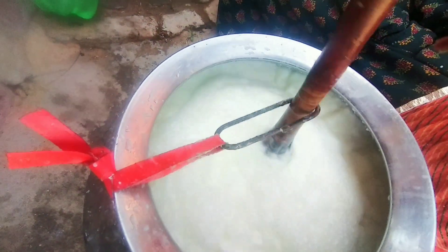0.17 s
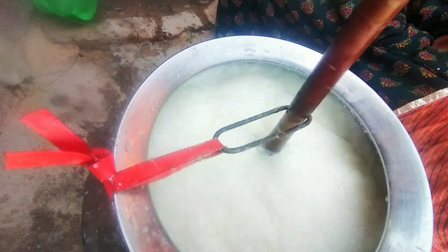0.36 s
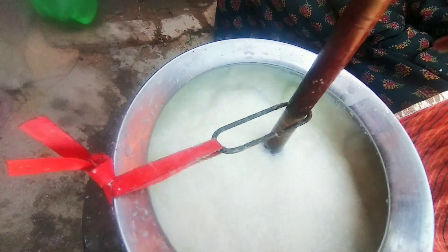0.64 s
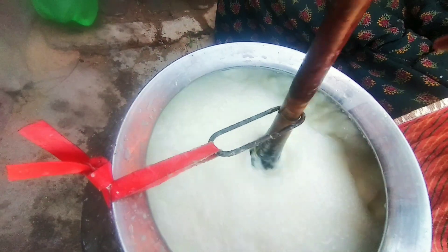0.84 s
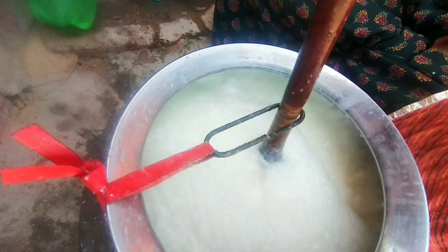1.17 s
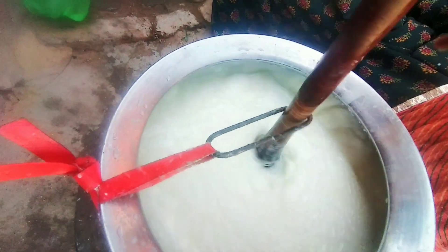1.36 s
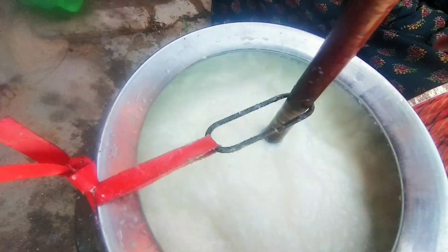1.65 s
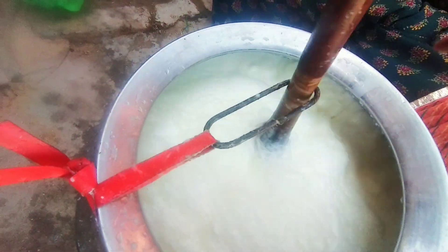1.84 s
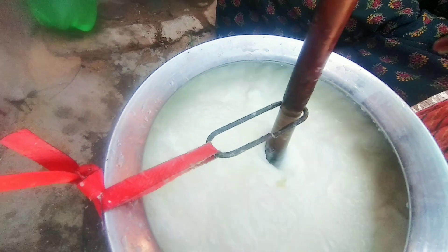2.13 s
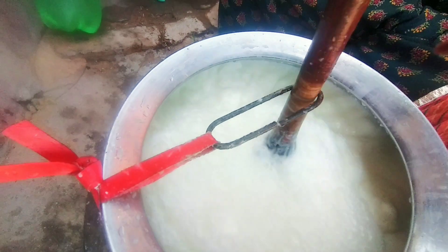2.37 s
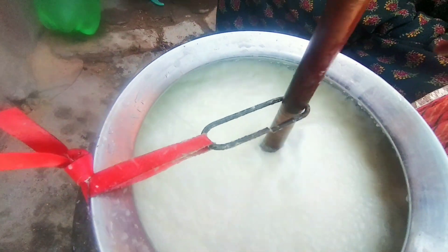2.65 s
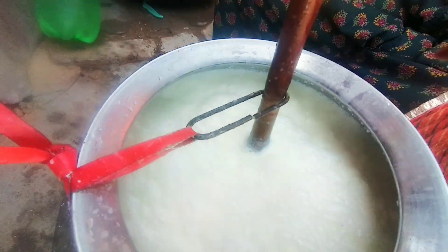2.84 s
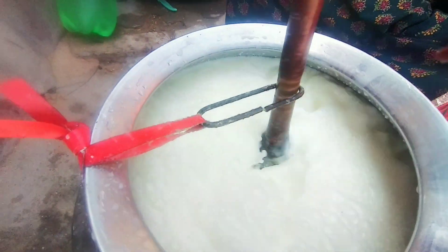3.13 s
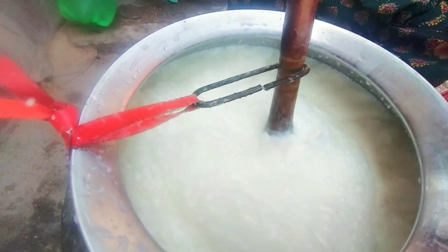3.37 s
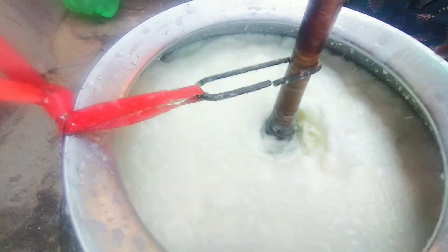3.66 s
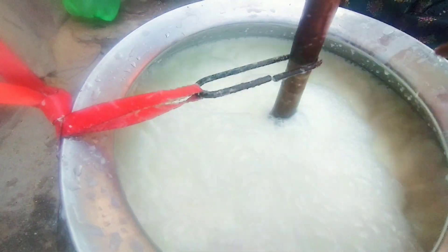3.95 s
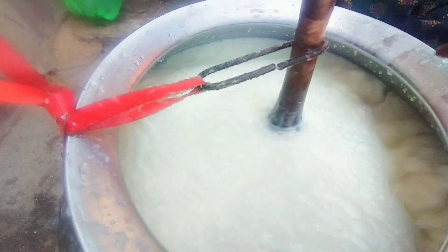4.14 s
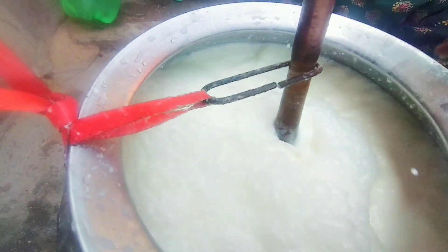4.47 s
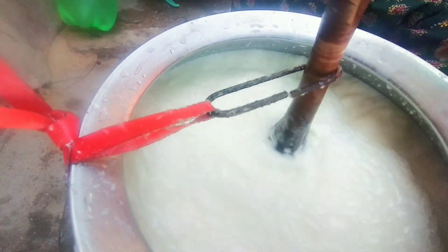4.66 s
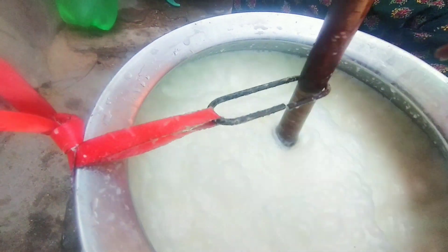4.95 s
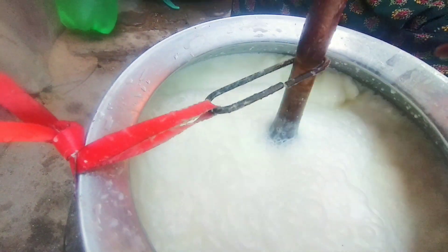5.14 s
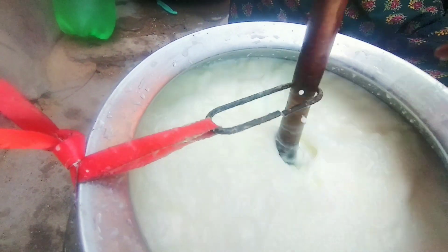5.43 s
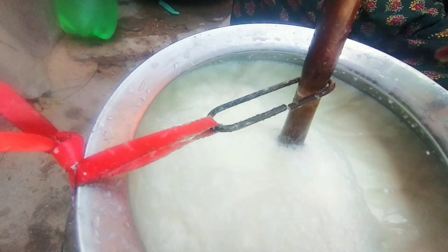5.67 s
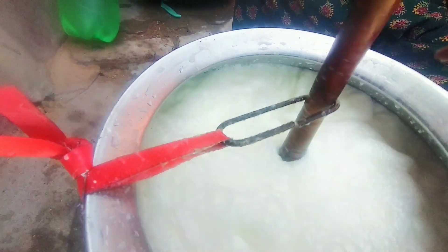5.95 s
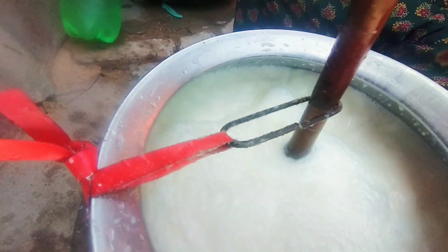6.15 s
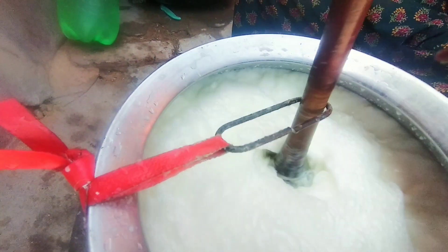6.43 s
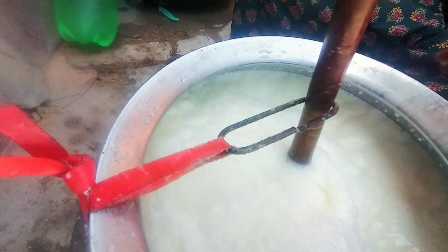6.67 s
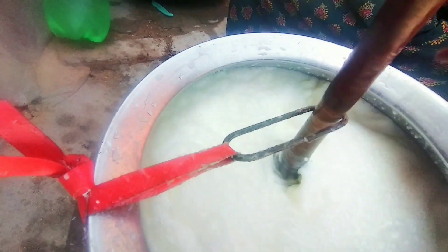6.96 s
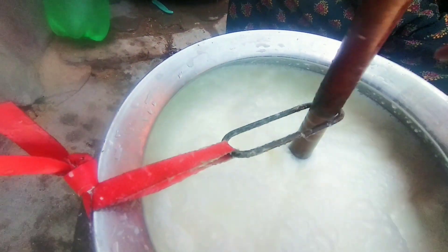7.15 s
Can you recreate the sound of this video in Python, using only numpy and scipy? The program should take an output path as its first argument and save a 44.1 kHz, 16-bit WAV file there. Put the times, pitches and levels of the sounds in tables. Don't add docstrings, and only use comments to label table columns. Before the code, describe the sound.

Close stereo view of curd being churned in a wide steel pot outdoors. About every half second a pull throws up a hollow, splashing slosh, with low glugs, gurgling bubbles and wet slaps on the walls. Fine spray hisses and drops tick back down between strokes. A soft low breeze rumbles at the hand-held phone.

```python
import sys
import numpy as np
from scipy import signal
from scipy.fft import rfft, irfft
from scipy.io import wavfile
from scipy.ndimage import uniform_filter1d

SR = 44100
rng = np.random.default_rng(int(sys.argv[2]) if len(sys.argv) > 2 else 0)


def how_loud(loudness_db):
    steps = np.asarray(loudness_db, float) / 20
    return 10 ** steps


def store_pcm(level_fs):
    pcm = np.round(np.clip(level_fs, -1, 1) * 32767).astype(np.int16)
    wavfile.write(sys.argv[1], SR, np.atleast_2d(pcm).T)


N = 321930
T = np.arange(N) / SR
HZ = np.fft.rfftfreq(N, 1 / SR)


def evened(x):
    return x / np.sqrt(np.mean(x ** 2) + 1e-20)


def read(points, hz):
    f, value = np.transpose(points)
    return np.interp(np.log(hz + 1), np.log(f + 1), value)


def coloured(x, points):
    return irfft(rfft(x) * how_loud(read(points, HZ)), N)


def ring(x, modes, order=1):
    delay = np.exp(-2j * np.pi * np.fft.rfftfreq(x.shape[-1]))
    response = 0
    for k, (hz, width_hz, db) in enumerate(modes):
        radius = np.exp(-np.pi * width_hz / SR)
        turn = np.exp(2j * np.pi * hz / SR)
        pair = sum(((1 - radius) / (1 - radius * pole * delay)) ** order for pole in (turn, 1 / turn))
        response = response + (-1) ** k * how_loud(db) / 2 * pair
    return irfft(rfft(x) * response, x.shape[-1])


def bursts(per_s, spread_db, decay_s, bed):
    happens = rng.random(N) < per_s / SR
    size = how_loud(spread_db * np.minimum(rng.exponential(1, N), 4)) * happens
    shape = evened(signal.filtfilt([1], [1, -np.exp(-1 / (decay_s * SR))], size))
    return (bed + shape) * rng.standard_normal((2, N))


def add(mix, s, sound):
    part = mix[:, round(s * SR):][:, :sound.shape[1]]
    part += sound[:, :part.shape[1]]


# start_s (of the peak), width_s (time to lose 10 dB), level_db
GUSTS = [(0.11, 0.17, -35.5), (0.47, 0.1, -39.0), (1.04, 0.11, -37.5), (1.48, 0.35, -40.5),
         (1.84, 0.31, -46.0), (2.2, 0.18, -43.0), (2.36, 0.09, -38.5), (2.67, 0.2, -37.0),
         (3.31, 0.18, -39.0), (3.48, 0.06, -35.5), (3.85, 0.17, -38.5), (4.4, 0.2, -37.5),
         (4.61, 0.07, -36.5), (4.87, 0.12, -38.0), (5.1, 0.12, -34.0), (5.53, 0.17, -33.5),
         (5.67, 0.09, -26.0), (5.94, 0.1, -37.5), (6.16, 0.34, -43.0), (6.92, 0.04, -33.5),
         (7.25, 0.5, -38.0)]
CALM_DB = -51


def gusts():
    power = sum(how_loud(db - 10 * ((T - s) / width_s) ** 2) ** 2 for s, width_s, db in GUSTS)
    return np.sqrt(how_loud(CALM_DB) ** 2 + power)


# frequency_hz, level_db (per Hz)
YARD = [(25, -9), (110, -8), (250, -17.5), (500, -3), (1000, -7), (2000, -25), (3600, -30.5), (10000, -41),
        (12000, -47), (15700, -50)]
YARD_DB = -45


def yard():
    lumps = bursts(per_s=13, spread_db=-2, decay_s=0.026, bed=2.3)
    breeze = ring(lumps, [(58, 28.5, 6), (30.2, 57, -14.5), (82, 32, -4)], order=2)
    wash = coloured(rng.standard_normal((2, N)), YARD)
    return how_loud(1.6) * gusts() * evened(breeze) + how_loud(YARD_DB) * evened(wash)


# start_s, level_db (peak), pitch_hz (centre), brightness_db
DROPS = [(0.2957, -25, 6260, -25), (0.5394, -34, 4410, -14), (0.6054, -43, 3570, 2),
         (0.7572, -37, 6070, -14), (1.0416, -31, 5670, -5), (1.1751, -34, 5730, -14),
         (1.4192, -26, 4760, -17), (1.5924, -25, 3580, -14), (1.6496, -29, 3520, -22),
         (1.6664, -33, 3500, -13), (2.5296, -22, 4070, -20), (2.779, -19, 3500, -18),
         (2.786, -18, 6500, -13), (3.5299, -36, 7350, -19), (3.6175, -34, 7660, -22),
         (3.6456, -21, 5660, -27), (3.7394, -23, 4150, -9), (3.8891, -26, 3680, -25),
         (3.9744, -38, 6030, -27), (4.0888, -24, 7000, -4), (4.109, -33, 5400, -9), (4.137, -36, 5660, -29),
         (4.391, -29, 5320, -7), (4.9314, -19, 3710, -17), (4.9797, -23, 3540, -23),
         (4.9994, -21, 6660, -22), (5.4674, -30, 3500, -7), (5.6885, -39, 3790, -18),
         (6.0691, -28, 5000, -30), (6.7356, -38, 4640, -5), ]
# start_s, level_db (peak)
TICKS = [(0.2823, -38), (0.3646, -25), (0.5945, -41), (0.8824, -32), (1.4052, -32), (1.5339, -23),
         (1.9365, -46), (1.9724, -30), (2.0627, -26), (2.4972, -31), (2.5391, -29), (2.8474, -42),
         (3.0739, -38), (3.243, -32), (3.7933, -29), (3.9175, -46), (4.2128, -36), (4.2278, -27),
         (4.4448, -42), (4.7671, -36), (4.8239, -27), (5.0908, -54), (5.3258, -34), (5.6067, -46),
         (5.8451, -36), (5.8571, -23), (6.4203, -36), (6.792, -50), (6.9596, -44), (6.9835, -34)]
TICK_HZ, TICK_BODY_DB, TICK_TOP_DB = 6500, -3.5, -2.5
# start_s, level_db (peak), pitch_hz (centre)
SPECKS = [(0.1321, -47, 6890), (0.3774, -23, 5630), (0.5154, -37, 5670), (0.8495, -31, 5470),
          (0.9981, -28, 7870), (1.3932, -31, 6900), (1.4117, -25, 5330), (1.9849, -25, 4850),
          (2.5197, -25, 5800), (2.6574, -23, 5810), (2.7544, -33, 5880), (2.7994, -38, 4520),
          (2.8294, -39, 6310), (2.8424, -41, 7000), (2.9844, -51, 5660), (3.1093, -24, 4550),
          (3.5578, -44, 7640), (3.8182, -26, 4810), (3.9644, -38, 4910), (4.0594, -51, 5530),
          (4.2053, -31, 5440), (4.2223, -21, 6440), (4.2956, -22, 5340), (4.3365, -26, 6770),
          (4.3454, -28, 6540), (4.7935, -24, 5520), (4.8813, -27, 5310), (5.0913, -41, 4840),
          (5.9015, -23, 7170), (5.9444, -20, 5430), (5.9644, -19, 7680), (5.9724, -23, 5950),
          (6.1394, -45, 4870), (6.4403, -28, 5670), (6.4694, -26, 6290), (6.5844, -37, 5920),
          (6.9636, -35, 6520), (6.9735, -27, 5010), (7.0204, -20, 4850), (7.1544, -23, 6090),
          (7.2474, -44, 5570)]
SPECK_BODY_DB, SPECK_TOP_DB = -3.5, -12
SNAP = 3.5


def drops():
    out, t = np.zeros((2, N)), np.arange(1500) / SR
    shape = (1 - np.exp(-t / 0.0004)) * (np.exp(-t / 0.0014) + 0.1 * np.exp(-t / 0.008))
    ticks = [(s, db + TICK_BODY_DB, TICK_HZ, TICK_TOP_DB) for s, db in TICKS]
    specks = [(s, db + SPECK_BODY_DB, hz, SPECK_TOP_DB) for s, db, hz in SPECKS]
    for s, db, hz, bright_db in list(DROPS) + ticks + specks:
        puff = rng.standard_normal((2, len(t))) * shape + SNAP * (t == t[6])
        body = ring(puff, [(hz, 2500, 0), (0.83 * hz, 2500, -5)], order=2)
        tick = ring(puff, [(8800, 2500, 1), (11300, 4300, 0), (14000, 4000, -13)], order=2)
        impact = body / abs(body).max() + how_loud(bright_db) * tick / abs(tick).max()
        add(out, s, how_loud(db - 1.5) * impact)
    return out


def plops(rows, climb, rise_s, decay_s, loss_db):
    out, t = np.zeros((2, N)), np.arange(2000) / SR
    envelope = (1 - np.exp(-t / rise_s)) * np.exp(-t / decay_s)
    for (s, db, hz), turn in zip(rows, rng.random((len(rows), 2))):
        tone = np.sin(2 * np.pi * (hz * (t + climb * t ** 2) + turn[:, None]))
        add(out, s, how_loud(db - loss_db) * tone * envelope)
    return out


# start_s, level_db (peak), pitch_hz
BUBBLES = [(.218, -29, 1780), (.718, -32, 1390), (.797, -28, 1510), (.874, -11.5, 1790), (1.364, -25, 1900),
           (1.367, -30, 2630), (1.88, -27, 1450), (1.905, -28, 1490), (2.026, -10, 1850),
           (2.439, -33, 1550), (2.48, -30, 2040), (3.49, -30, 1890), (3.565, -33, 2020),
           (4.687, -26.5, 1240), (5.018, -24, 2500), (5.161, -26, 1050), (5.177, -38, 2700),
           (5.188, -28, 1200), (5.188, -36, 2100), (5.199, -21, 1350), (5.209, -34, 2600),
           (5.227, -35, 2800), (5.236, -31, 1900), (5.291, -24, 1170), (5.727, -40, 2300),
           (5.796, -28, 2100), (5.819, -33, 2840), (6.497, -10, 1520), (6.714, -24, 1110)]


def bubbles():
    return plops(BUBBLES, climb=14.2, rise_s=0.00052, decay_s=0.0024, loss_db=-1.5)


# start_s, level_db (peak), pitch_hz
SLAPS = [(0.2942, -23, 1760), (0.3212, -17, 1930), (0.3431, -13, 1670), (0.5147, -23, 2110),
         (0.5342, -20, 1840), (0.851, -13, 1970), (1.062, -26, 1940), (1.4132, -19, 1770),
         (1.4815, -13, 2020), (1.5434, -20, 2100), (1.95, -26, 1930), (1.9769, -19, 1810),
         (2.1146, -17, 1860), (2.5102, -22, 1900), (2.5222, -18, 1870), (2.5391, -12, 1670),
         (2.5721, -12, 2000), (3.0644, -24, 1390), (3.1048, -16, 1220), (3.1537, -14, 1810),
         (3.6067, -29, 1960), (3.6845, -17, 1640), (3.6945, -14, 1460), (3.7115, -10, 1350),
         (3.8023, -17, 1720), (4.2128, -19, 1810), (4.2263, -14, 1490), (4.2807, -13, 1790),
         (4.7272, -23, 1380), (4.7631, -16, 1450), (4.8494, -13, 1790), (4.9317, -19, 1990),
         (4.9766, -20, 2030), (5.3253, -21, 1870), (5.3438, -18, 1730), (5.8551, -17, 1450),
         (5.875, -14, 1400), (6.3794, -29, 1250), (6.4058, -24, 2160), (6.4203, -21, 1500),
         (6.4428, -13, 1500), (6.4852, -9, 1400), (6.775, -31, 1130), (6.9536, -24, 1380),
         (6.9701, -18, 1990), (7.0314, -10, 1360), (7.0743, -10, 1570), (7.0864, -12, 1480),
         (7.1062, -16, 2060)]


def slaps():
    return plops(SLAPS, climb=12.5, rise_s=0.0005, decay_s=0.0022, loss_db=-0.8)


# start_s, level_db (peak), pitch_hz
MORE_GLUGS = [(0.323, -15, 552), (0.396, -13, 401), (0.821, -26, 498), (0.891, -15, 447), (0.986, -15, 428),
              (1.095, -19, 409), (1.556, -14, 471), (1.638, -19, 568), (2.027, -14, 530), (2.054, -9, 484),
              (2.227, -17, 463), (2.521, -18, 503), (2.686, -15, 455), (2.89, -24, 458), (2.943, -27, 514),
              (3.194, -10, 616), (3.219, -8, 471), (3.261, -15, 576), (3.307, -16, 495), (3.488, -22, 482),
              (3.719, -11, 460), (3.769, -11, 474), (3.863, -18, 458), (3.915, -18, 425), (4.262, -13, 517),
              (4.305, -8, 493), (4.349, -14, 433), (4.461, -19, 420), (4.762, -17, 331), (4.787, -12, 554),
              (4.813, -12, 452), (4.862, -9, 525), (4.917, -14, 506), (4.955, -18, 474), (5.269, -25, 509),
              (5.326, -15, 506), (5.465, -12, 439), (5.489, -14, 503), (5.864, -15, 471), (5.931, -10, 460),
              (5.992, -14, 530), (6.471, -16, 528), (6.495, -15, 592), (6.578, -14, 506), (6.963, -17, 525)]


def more_glugs():
    return plops(MORE_GLUGS, climb=4.1, rise_s=0.002, decay_s=0.006, loss_db=-3)


# start_s, level_db (peak), pitch_hz
GLUGS = [(0.363, -11, 517), (0.551, -13, 455), (1.5, -14, 460), (1.785, -14.5, 415), (2.121, -12, 523),
         (2.294, -17, 550), (2.421, -12, 440), (2.604, -7, 487), (2.641, -4.5, 476), (2.739, -15, 480),
         (3.241, -10, 545), (3.698, -14, 526), (3.79, -8.5, 470), (4.241, -10, 550), (4.844, -9, 479),
         (5.087, -11.5, 414), (5.159, -21, 533), (5.176, -18, 387), (5.534, -11.5, 500), (5.917, -5.5, 490),
         (6.05, -13, 440), (6.546, -13, 440), (6.714, -17, 510), (7.085, -7, 520), (7.166, -11, 450)]


def glugs():
    return plops(GLUGS, climb=4.3, rise_s=0.0028, decay_s=0.0066, loss_db=2)


# start_s, length_s, level_db, sag_db (over its length)
PULLS = [(0.346, 0.133, -36.0, 4.5), (0.877, 0.135, -35.0, 7.0), (1.413, 0.131, -42.5, -4.5),
         (1.982, 0.094, -38.5, -1.0), (2.538, 0.162, -32.5, 6.5), (3.099, 0.158, -38.5, -3.5),
         (3.698, 0.154, -32.5, 13.5), (4.226, 0.131, -34.5, 8.0), (4.76, 0.125, -38.0, -1.0),
         (5.321, 0.051, -42.0, -0.5), (5.86, 0.12, -41.0, -9.0), (6.431, 0.101, -40.0, -3.5),
         (6.982, 0.134, -35.0, 0.5)]
# start_s, length_s, level_db
SLOPS = [(0.295, 0.009, -46.0), (0.328, 0.005, -45.5), (0.453, 0.005, -53.0), (0.531, 0.015, -44.5),
         (1.024, 0.029, -55.0), (1.417, 0.087, -38.0), (1.567, 0.025, -42.0), (1.635, 0.032, -46.0),
         (2.111, 0.008, -42.5), (2.469, 0.045, -57.0), (2.688, 0.068, -42.5), (2.778, 0.031, -41.5),
         (3.077, 0.008, -48.0), (3.315, 0.006, -51.0), (3.648, 0.146, -43.0), (3.819, 0.014, -43.0),
         (3.889, 0.009, -43.0), (4.365, 0.022, -45.5), (4.757, 0.044, -53.0), (4.93, 0.005, -41.0),
         (4.977, 0.014, -39.5), (5.397, 0.017, -40.5), (5.463, 0.005, -46.0), (5.857, 0.005, -55.0),
         (6.048, 0.018, -48.0), (6.549, 0.041, -46.0), (7.135, 0.045, -38.5), (7.196, 0.031, -45.5)]
# rest_s, rest_db, crest_s, crest_db,
# heave_db (of the heavy mass, below the crest)
SWELLS = [(-0.4, -45.5, -0.1, -30.0, -7.5), (0.18, -38.0, 0.33, -20.5, -14.5),
          (0.7, -37.0, 0.98, -24.0, -8.0), (1.29, -37.5, 1.39, -28.0, -7.0),
          (1.84, -37.5, 2.07, -15.5, -17.5), (2.42, -37.5, 2.51, -30.5, -2.0),
          (2.96, -35.5, 3.14, -21.5, -10.5), (3.52, -34.5, 3.68, -24.0, -9.0),
          (4.06, -35.0, 4.28, -24.0, -7.5), (4.65, -37.5, 4.74, -23.5, -11.0),
          (5.16, -35.0, 5.34, -24.5, -6.0), (5.73, -36.0, 5.86, -23.5, -11.0),
          (6.26, -36.0, 6.49, -22.5, -9.5), (6.86, -39.0, 7.06, -26.5, -10.0)]
LAST_REST_S = 7.42


def level(rule, heavy=False):
    splash_db, slop_db, arch_db, lean_db, rise, fall, swell_db, depth, bend_up, bend_down, delay_s = rule
    t = T[::64]
    throws = [(s, n, db, sag_db + lean_db, arch_db) for s, n, db, sag_db in PULLS]
    throws += [(s, n, db + slop_db, 0, 0) for s, n, db in SLOPS]
    start, length, db, sag_db, crown_db = np.transpose(throws)[:, :, None]
    along = np.clip((t - start) / length, 0, 1)
    arch = crown_db * np.sin(np.pi * along) - sag_db * along
    before = rise * np.minimum(t - start, 0)
    after = fall * np.maximum(t - start - length, 0)
    splash = db + before + arch - after

    rest, rest_db, crest, crest_db, heave_db = np.transpose(SWELLS)
    turns = np.append(np.ravel([rest, crest], "F"), LAST_REST_S) + delay_s
    phase = np.interp(t, turns, np.arange(len(turns))) % 2
    top = np.interp(t, crest + delay_s, crest_db + heavy * heave_db)
    bottom = np.interp(t, rest + delay_s, rest_db)
    drop = (top - bottom) * abs(1 - phase) ** np.where(phase < 1, bend_up, bend_down)
    power = (how_loud(splash_db + splash) ** 2).sum(0) + how_loud(swell_db + top - depth * drop) ** 2
    return np.interp(T, t, np.sqrt(power))


def fizz(count, size, low_hz, top_hz, cycles, glide, spread_db):
    place, pitch, chance, left, right = rng.random((count, 5)).T[:, :, None]
    hz, k = low_hz * (top_hz / low_hz) ** pitch, np.arange(size)
    turns = hz * k / SR
    swell = np.sin(np.pi * np.clip(turns / cycles, 0, 1) ** 0.42) ** 2
    height = hz * how_loud(-spread_db * np.log(chance + 0.022)) * swell
    at = ((place * N).astype(int) + k).ravel()
    gliding = turns * (1 + glide * turns / cycles)
    waves = [height * np.sin(2 * np.pi * (gliding + start)) for start in (left, right)]
    return evened(np.array([np.bincount(at, w.ravel(), N)[:N] for w in waves]))


# splash_db, slop_db, arch_db, extra_sag_db,
# rise [dB/s], fall [dB/s], swell_db, depth [ratio], bend_rising [power], bend_falling [power], delay_s
SPRAY_RULE = (-3.7, 1.6, 4.0, -.8, 640, 600, -28.9, 1.2, .73, .91, .02)
# frequency_hz, level_db (per Hz)
SPRAY = [(3000, -4), (4300, -4), (5200, -2.5), (6200, -0.5), (8000, -6.5), (10200, -9.5), (11300, -18),
         (12500, -33), (15500, -46)]


def spray(hiss):
    small = fizz(count=6000, size=260, low_hz=3950, top_hz=14900, cycles=17.0, glide=0.046, spread_db=3.0)
    return how_loud(1.55) * level(SPRAY_RULE) * evened(coloured(hiss + how_loud(-6.0) * small, SPRAY))


SPATTER_RULE = (-.3, 1.9, 1.7, -1.9, 560, 600, -30.4, 1.45, 1.82, 5.37, 0)
# frequency_hz, level_db (per Hz)
SPATTER = [(900, -4), (1500, 4), (2200, 2.5), (3000, -1.5), (3900, -5), (5000, -15), (7000, -29.5)]


def spatter(hiss):
    large = fizz(count=3000, size=400, low_hz=1303, top_hz=4910, cycles=10.5, glide=0.12, spread_db=3.0)
    return how_loud(4.5) * level(SPATTER_RULE) * evened(coloured(hiss + how_loud(-7.5) * large, SPATTER))


HEAVE_RULE = (1.5, -18.2, -1.1, -5.2, 261, 372, 4.55, 7.69, 1.43, 1.71, .08)
# pitch_hz, width_hz, level_db
MASS = [(170.5, 61, 2), (205.8, 39.6, -1.5), (295, 207, -2.5)]


def heave():
    lumps = bursts(per_s=49, spread_db=0.0, decay_s=0.0036, bed=3.2)
    return how_loud(1.0) * level(HEAVE_RULE, heavy=True) * evened(ring(lumps, MASS, order=2))


SURF_RULE = (8.5, -2.1, 5.4, 2.5, 415, 331, -14.3, 1.26, 2.71, 3.47, .01)
# pitch_hz, width_hz, level_db
WALLS = [(1376, 303, 2.5), (1850, 870, 2), (2300, 1500, -11.5)]


def surf():
    kicks = bursts(per_s=280, spread_db=2.5, decay_s=0.0012, bed=1.8)
    return how_loud(-1.6) * level(SURF_RULE) * evened(ring(kicks, WALLS, order=2))


GLUG_RULE = (8.3, 4, 5, -4.6, 296, 404, -1.5, 1.19, .46, 2.56, .01)
# pitch_hz, width_hz, level_db
CAVITY = [(411.5, 126, -1.5), (484.2, 115, 2), (601.5, 186, -3.5), (791, 235, -9), (1124, 460, -21)]


def air_column():
    kicks = bursts(per_s=250, spread_db=3, decay_s=0.00045, bed=2.8)
    return how_loud(-1.4) * level(GLUG_RULE) * evened(ring(kicks, CAVITY, order=2))


def clumped(x, depth_db, wide, long):
    z = signal.stft(x, nperseg=256, noverlap=192)[2]
    field = rng.standard_normal(z.shape[1:])
    for _ in range(2):
        field = uniform_filter1d(uniform_filter1d(field, int(wide), 0), int(long), 1)
    return signal.istft(z * how_loud(depth_db * evened(field)), nperseg=256, noverlap=192)[1][:, :N]


def churn():
    hiss = evened(bursts(per_s=130, spread_db=3.0, decay_s=0.0027, bed=2.3))
    wet = air_column() + surf() + spray(hiss) + spatter(hiss)
    return clumped(wet, depth_db=1.5, wide=4, long=9) + heave()


def scene():
    around = yard() + drops()
    return around + bubbles() + slaps() + more_glugs() + glugs() + churn()


def roll_off(x):
    return signal.sosfilt(signal.butter(12, 15830, fs=SR, output="sos"), x)


# frequency_hz, likeness [0 to 1]
SAME = [(30, .65), (110, .82), (170, .95), (270, .91), (480, .99), (650, .93), (850, .4), (1200, .28),
        (1450, .82), (2050, .86), (2480, .25), (3250, .72), (4500, .25), (7000, .08)]
# frequency_hz, level_db
PORTS = [(60, -2), (450, 0.5), (780, -4), (1000, -0.5), (1300, -3.5), (2100, -1), (2400, 2), (4800, 2),
         (7400, 1), (8200, -6.5), (9300, -20), (11000, -19), (14000, -9)]
# frequency_hz, phase [radians]
LAG = [(20, 0), (250, 0), (620, -.3), (950, .8), (1130, -.5), (1400, .1), (1950, .3), (2300, .8),
       (2650, -.5), (3300, -.1), (6400, -.8)]


def record(dry):
    a, b = rfft(dry)
    same = np.clip(read(SAME, HZ), -1, 1)
    tilt = how_loud(read(PORTS, HZ))
    right = (same * a + np.sqrt(1 - same ** 2) * b) * np.exp(-1j * read(LAG, HZ))
    both = np.array([tilt * a, right]) * 2 / np.sqrt(1 + tilt ** 2 + 2 * same * tilt)
    both *= np.clip((15800 - HZ) / 300, 0, 1)
    held = 1.3 * np.tanh(irfft(both, N) / 1.3)
    return roll_off(held)


dry = scene()
out = record(dry)
store_pcm(out)
```